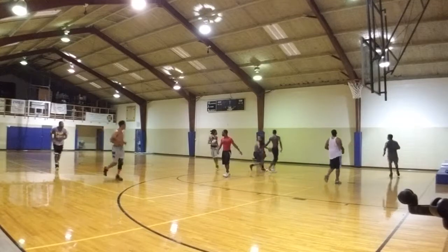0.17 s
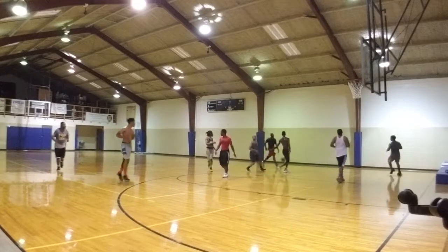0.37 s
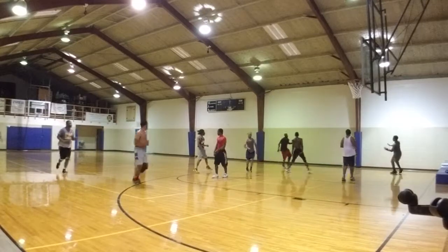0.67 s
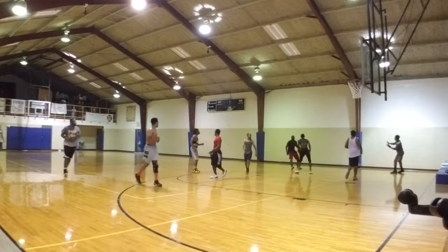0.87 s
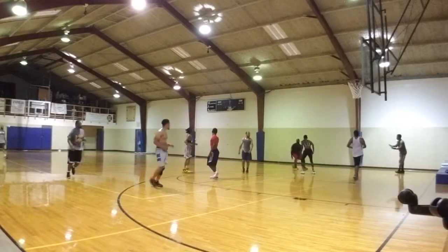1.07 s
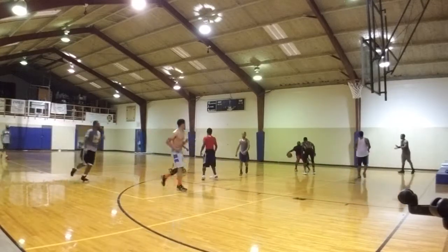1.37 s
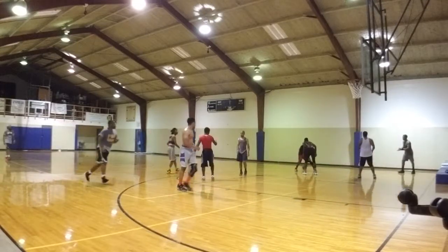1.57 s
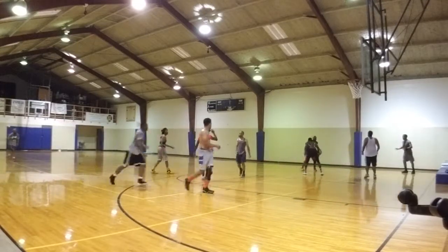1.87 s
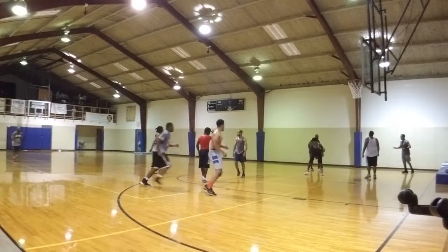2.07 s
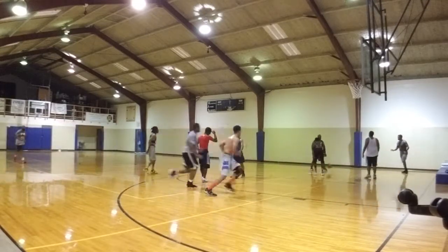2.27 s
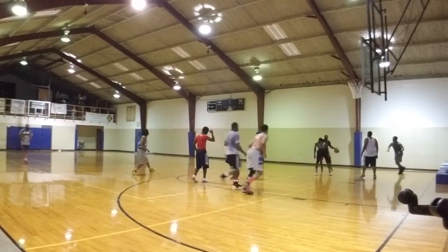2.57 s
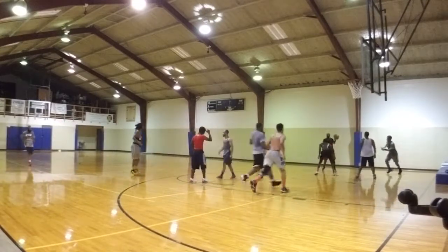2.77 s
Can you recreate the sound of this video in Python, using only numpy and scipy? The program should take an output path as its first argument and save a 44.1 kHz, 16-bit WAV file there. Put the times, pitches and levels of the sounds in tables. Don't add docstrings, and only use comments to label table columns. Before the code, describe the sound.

Basketball bouncing four times on a sprung wooden gym floor, with rubber shoe squeaks in between

```python
import sys
import numpy as np
from scipy import signal
from scipy.fft import rfft, irfft
from scipy.io import wavfile
from scipy.ndimage import uniform_filter1d

SR = 44100
rng = np.random.default_rng(int(sys.argv[2]) if len(sys.argv) > 2 else 0)


def transcribe(signal):
    frames = np.atleast_2d(signal).T
    limited = np.clip(frames, -1, 1)
    pcm = np.round(limited * 32767).astype(np.int16)
    wavfile.write(sys.argv[1], SR, pcm)


def level_to_linear(level):
    exponent = np.asarray(level, float) / 20
    return 10 ** exponent


N = 127890
LEAD = SR // 2
M = N + LEAD
LEFT_LEAD_S = .00043
SLIP_T_S = np.arange(SR // 8) / SR
ATTACK_S, SCUFF_ATTACK_S, RELEASE_S = 0.0019, 0.0042, 0.0015
SQUEAK_WANDER, SQUEAK_WANDER_HZ = 0.008, 110


def at_hz(points, hz, axis=1):
    points = np.array(points)
    return np.interp(np.log(hz), np.log(points[:, 0]), points[:, axis])


def drift(rate_hz, size):
    r = np.exp(-2 * np.pi * rate_hz / SR)
    slow = signal.lfilter([1], [1, -2 * r, r * r], rng.standard_normal(size + 600))[600:]
    return slow * np.sqrt((1 - r * r) ** 3 / (1 + r * r))


def bands(size):
    # hz [Hz], likeness [-1..1]
    likeness = [(60, 0.91), (180, 1), (550, 0.12), (1650, 0.15), (4970, 0.074), (15000, -0.17)]
    edges_hz = 22 * 2 ** np.arange(0, 9.6, .5)
    white = rng.standard_normal((2, 2, size))
    for k, (low, high) in enumerate(zip(edges_hz, edges_hz[1:])):
        band = signal.butter(2, [low, high], "band", fs=SR, output="sos")
        mid, side = signal.sosfilt(band, white[k % 2])
        hz = np.sqrt(low * high)
        alike = np.clip(at_hz(likeness, hz), -1, 1)
        pair = np.sqrt(1 + alike) * mid + np.sqrt(1 - alike) * side * [[1], [-1]]
        yield hz, pair / np.sqrt(2)


def ventilation():
    # hz [Hz], density_db [dB per Hz]
    air = [(25, -46), (120, -2), (300, -17.5), (620, -25), (800, -29.5), (3000, -37), (6500, -37),
           (9500, -48.5)]
    points = M // 40 + 2
    slow = np.arange(M) / 40
    out = 0
    for hz, pair in bands(M):
        waver_db = 1.85 * np.interp(slow, np.arange(points), drift(188, points))
        out = out + pair * level_to_linear(at_hz(air, hz) + waver_db)
    return level_to_linear(-30) * out / np.sqrt(np.mean(out ** 2)) * level_to_linear(np.array([[-.8], [.8]]))


def add(out, s, sound, pan_db, lead_s=LEFT_LEAD_S):
    for row, (share, late_s) in enumerate(((.5, 0), (-.5, lead_s), (-.5, 0))):
        i = LEAD + int((s + late_s) * SR)
        out[row, i:i + len(sound)] += (level_to_linear(share * pan_db) * sound)[:max(M - i, 0)]


def grip(length_s, attack_s=ATTACK_S):
    release = np.exp(-np.maximum(SLIP_T_S - length_s, 0) / RELEASE_S)
    return np.clip(SLIP_T_S / attack_s, 0, 1) * release


def slip(hz, db, wander=SQUEAK_WANDER, rate_hz=SQUEAK_WANDER_HZ, dull_db=0):
    overtone_db = [-14, -18]
    phase = 2 * np.pi * np.cumsum(hz * (1 + wander * drift(rate_hz, len(hz)))) / SR
    bright_db = dull_db + .6 * (db + 16)
    tone = np.sin(phase)
    for k, level_db in enumerate(overtone_db, 2):
        tone = tone + level_to_linear(level_db + bright_db) * np.sin(k * phase) * (k * hz < 17e3)
    return tone * level_to_linear(db + 2.5 * drift(220, len(hz)))


def squeaks(out):
    # start_s [s], length_s [s], level_db [dB], # pitch_hz [Hz], left_right_db [dB]
    near = [(-.04, 0.0095, -14, 2347, 1), (-.03, 0.017, -27, 4630, -3), (0.063, 0.023, -33.5, 4620, -11),
            (0.671, 0.011, -20, 5110, -8.5), (0.959, 0.027, -25, 3770, 7), (0.828, 0.029, -17, 3745, -5),
            (.829, 0.037, -23, 3400, 3), (1.072, 0.008, -19, 4600, 3), (1.085, 0.0045, -22, 4780, -3),
            (1.161, 0.011, -23.5, 4530, -12), (1.225, 0.023, -11, 4097, 3),
            (1.25, 0.019, -15.5, 3770, -4.5), (1.519, 0.01, -25.5, 5540, -11.5),
            (2.089, 0.0094, -15, 4934, -0.5), (2.759, 0.0057, -15.5, 3610, 8.5),
            (2.811, 0.0078, -20.5, 3575, -7)]
    # [s, s, dB, Hz, dB]
    far = [(.57, 0.04, -37, 6640, -3), (1.5, 0.038, -27, 9050, -3), (-.2, 0.16, -32.5, 5890, -3),
           (1.03, 0.0078, -17.5, 5470, -10.5), (1.045, 0.0058, -9, 5485, -8.5),
           (1.127, .012, -18, 5380, -6), (1.818, 0.034, -32, 3970, -4), (2.321, 0.0072, -19, 4560, -11),
           (.356, 0.012, -17.5, 7680, -2.5), (1.202, 0.015, -31.5, 6970, -13),
           (1.29, 0.0071, -24, 5380, -13)]
    sharp = 1 + .025 * np.exp(-SLIP_T_S / .004)
    for table, dull_db in ((near, 0), (far, -9)):
        for s, length_s, db, hz, pan_db in table:
            add(out, s, grip(length_s) * slip(hz * sharp, db, dull_db=dull_db), pan_db)


def scuffs(out):
    events = [(.105, 0.019, -31.5, 6230, -5.5), (.13, 0.034, -31, 4150, -3.5), (.3, 0.091, -21, 4146, 0.5),
              (0.299, 0.029, -30, 12330, -7.5), (0.4, 0.05, -24.5, 4580, -17),
              (0.662, 0.04, -29.5, 5600, -9.5), (1.055, 0.049, -30, 4500, -14),
              (1.2, 0.0425, -25, 3735, -6), (2.088, 0.0035, -22.5, 5430, -22),
              (1.5, 0.052, -33.5, 4634, -3), (1.05, 0.016, -23, 6400, -11)]
    for s, length_s, db, hz, pan_db in events:
        treads = 0
        for k in (-1, 0, 1):
            tread_hz = np.full(len(SLIP_T_S), hz * (1 + k * .07))
            treads = treads + slip(tread_hz, db - 1.5 - 5 * abs(k), .034, 720)
        add(out, s, grip(length_s, SCUFF_ATTACK_S) * treads, pan_db)


def bends(out):
    # start_s [s], length_s [s], level_db [dB], first_hz [Hz], last_hz [Hz]
    turns = [(.667, .016, -21.5, 2500, 2710), (.945, 0.019, -13.5, 4237, 4107),
             (1.249, 0.019, -20, 4287, 4440), (1.459, 0.042, -27, 4453, 4323),
             (1.49, 0.059, -25.5, 4440, 4646), (2.149, 0.02, -19.5, 4717, 4630),
             (2.178, 0.041, -22, 4534, 4500), (2.233, 0.087, -27, 4505, 4695)]
    # [s, s, dB, Hz, Hz]
    scrapes = [(.3, 0.0246, -27.5, 5300, 4650), (.302, 0.0473, -23, 4250, 4120),
               (.305, 0.0406, -26.5, 3500, 3120), (.343, .035, -17, 4300, 3900),
               (.313, 0.0203, -28.5, 6700, 6250), (.54, .045, -27.5, 5050, 4400),
               (.56, 0.048, -26.5, 3560, 3330), (.555, 0.0304, -23.5, 4300, 4700),
               (1.1, 0.0282, -23.5, 3480, 3850), (1.3, 0.0087, -26, 3200, 3750),
               (1.09, 0.031, -28, 4500, 4600)]
    for table, wander, rate_hz in ((turns, SQUEAK_WANDER, SQUEAK_WANDER_HZ), (scrapes, .018, 380)):
        for s, length_s, db, first_hz, last_hz in table:
            hz = np.interp(SLIP_T_S, [0, length_s], [first_hz, last_hz])
            add(out, s, grip(length_s) * slip(hz, db, wander, rate_hz), -5.5)


def skid(out):
    path = [
        (1.524, 6200, -30),
        (1.531, 6350, -21),
        (1.536, 6850, -16),
        (1.549, 6800, -21),
    ]
    s, hz, db = np.transpose(path)
    now_s = SLIP_T_S + s[0]
    fade = np.exp(-np.maximum(now_s - s[-1], 0) / RELEASE_S)
    add(out, s[0], fade * slip(np.interp(now_s, s, hz), np.interp(now_s, s, db)), -5)


def soles():
    out = np.zeros((3, M))
    squeaks(out)
    bends(out)
    scuffs(out)
    skid(out)
    return out


def modes(table, t, factor, spread_db, deep_db=0.0):
    out = 0
    for hz, db, t60_s in table:
        level_db = db + deep_db * (hz < 90) + spread_db * rng.standard_normal()
        phase = rng.uniform(0, 2 * np.pi)
        out = out + level_to_linear(level_db - 60 * t / t60_s) * np.sin(2 * np.pi * hz * factor * t + phase)
    return out


def blow(tap_db, boom_db, dull_hz, boom_s, ping_db=-90, factor=1.0, deep_db=0.0, thud_db=-12):
    # mode_hz [Hz], level_db [dB], t60_s [s]
    ball = [(790, -13, .04), (960, -10, .05), (1040, -9, .05), (1140, -13, .04), (1400, -13, .04),
            (1560, -10, .05), (1890, -13, .04), (2300, -14, .03)]
    # mode_hz [Hz], level_db [dB], t60_s [s]
    boards = [(50, -7, 0.78), (64.4, 1, 0.67), (85, -0.5, 0.48), (104.2, -1, 0.41), (120.5, 7.5, 0.39),
              (134.7, 2, 0.17), (170.6, -1.5, 0.11), (215.2, -3.5, 0.22), (291.5, -7, 0.2)]
    t = np.arange(SR // 2) / SR
    slap_noise, thud_noise = rng.standard_normal((2, len(t)))
    slap = signal.lfilter(*signal.butter(2, [1200, dull_hz], "band", fs=SR), slap_noise)
    slap = slap * np.exp(-t / .0032) * np.minimum(t / .00026, 1)
    thud = signal.lfilter(*signal.butter(1, [420, 2310], "band", fs=SR), thud_noise)
    thud = thud * level_to_linear(thud_db) * np.exp(-t / .03)
    ping = level_to_linear(ping_db + 9.6 * drift(78, len(t))) * modes(ball, t, factor, 4.0)
    tap = slap + (thud + ping) * (1 - np.exp(-t / .003))
    swell = (1 - np.exp(-(t / .011) ** 2)) / (1 + (t / boom_s) ** 6)
    boom = modes(boards, t, .95, 1.74, deep_db) * swell / 2
    return level_to_linear(tap_db) * tap, level_to_linear(boom_db) * boom


def lay_blow(out, floor, s, pan_db, sounds, wall_db, lead_s=LEFT_LEAD_S):
    tap, boom = sounds
    add(out, s, tap, pan_db, lead_s)
    add(out, s + .111, level_to_linear(wall_db) * tap, pan_db)
    floor[LEAD + int(s * SR):][:len(boom)] += boom


def steps(out, floor):
    taps = [(.14, -21, -19.5, -7), (0.753, -31, -24.5, 4), (1.199, -19.5, -34, -4), (0.551, -26, -24.5, 22),
            (.708, -10, -21.5, -2), (.712, -18.5, -50, 3), (0.992, -22, -26.5, -8), (1.376, -46, -31, -5),
            (1.447, -39, -43, 5), (2.226, -44, -39, 2), (2.641, -25.5, -56.5, -5), (2.768, -28, -60, -22),
            (2.795, -28, -26, 4)]
    for s, db, boom_db, pan_db in taps:
        lay_blow(out, floor, s, pan_db, blow(db, boom_db, 6200, .035), -20)


def bounces(out, floor):
    hits = [
        (.349, -10, -10.5, 0.86, 0),
        (1.117, -15, -14, 1.06, -2.5),
        (1.598, -20, -14.5, 0.68, -4.5),
        (2.339, -13.5, -9.5, 0.5, -1),
    ]
    for s, db, boom_db, factor, deep_db in hits:
        sounds = blow(db, boom_db, 13000, .1, -10, factor, deep_db, thud_db=1)
        lay_blow(out, floor, s, -1.2, sounds, -14, lead_s=.0001)


def blows():
    out, floor = np.zeros((3, M)), np.zeros(M + SR)
    bounces(out, floor)
    steps(out, floor)
    return out, floor[:M]


def hall(x):
    decay = [(60, 1.7, -0.5), (206, 1.4, -2.5), (1020, 1.2, -3), (2500, 2.3, -8), (4500, 2.38, -7.5),
             (8100, 1.06, -12.5), (14000, 0.89, -15.5)]
    t = np.arange(int(1.6 * SR)) / SR
    echoes = rng.random((2, len(t))) < 300 / SR
    lumps = uniform_filter1d(echoes * rng.exponential(1, (2, len(t))) * 60, size=60)
    rise = 1 - np.exp(-(t / .014) ** 2)
    shape = rise * (1 + level_to_linear(2) * lumps * np.exp(-t / .12))
    ring = 0
    for hz, pair in bands(len(t)):
        t60_s = at_hz(decay, hz)
        fall = level_to_linear(at_hz(decay, hz, axis=2) - 60 * t / t60_s)
        unit_energy = np.sqrt(6 * np.log(10) / t60_s / SR)
        ring = ring + pair * fall * unit_energy * (shape if hz > 400 else shape[0])
    balance = level_to_linear(np.array([[.5], [-.5]]) * -4)
    return signal.fftconvolve(x[None], ring, axes=1)[:, :M] * balance


def scene():
    taps, floor = blows()
    near = taps + soles() + floor * level_to_linear(np.array([[-.6], [.6], [-9.5]]))
    return (near[:2] + hall(near[2]) + ventilation())[:, LEAD:]


def band_limit(x):
    return signal.sosfilt(signal.butter(12, 15750, fs=SR, output="sos"), x)


def record(dry):
    capsules = [(7500, -0.75), (10300, -7.5), (12800, 3), (15500, -8)]
    hz = np.maximum(np.arange(N // 2 + 1) * SR / N, 1)
    coloured = irfft(rfft(dry) * level_to_linear(at_hz(capsules, hz)), N)
    low_pass = signal.cheby2(12, 60, 16250, fs=SR, output="sos")
    return band_limit(signal.sosfilt(low_pass, coloured))


dry = scene()
out = record(dry)
transcribe(out)
```